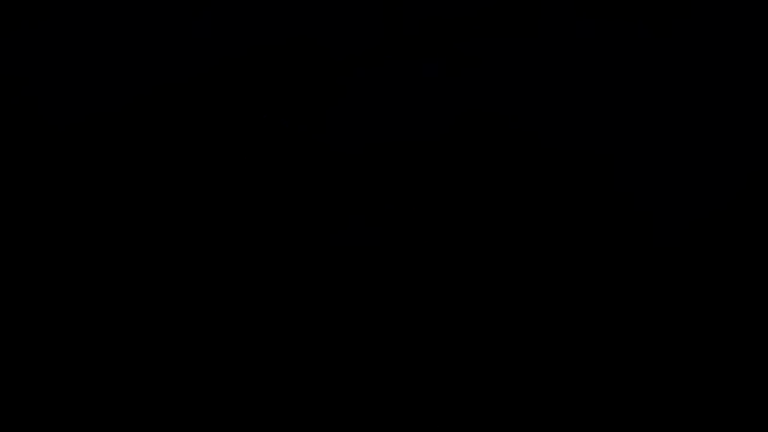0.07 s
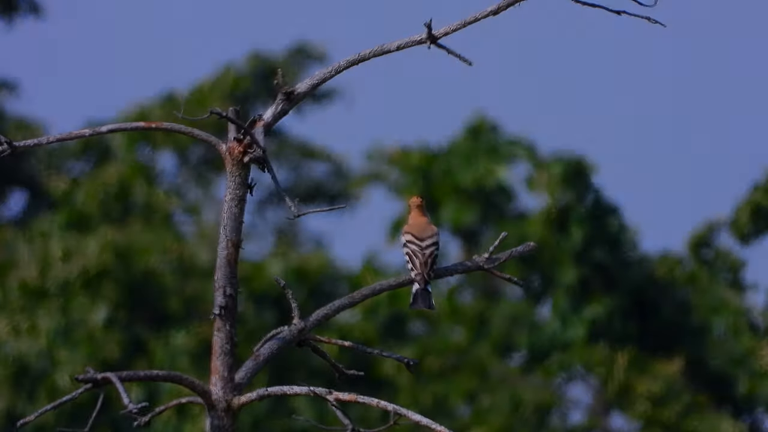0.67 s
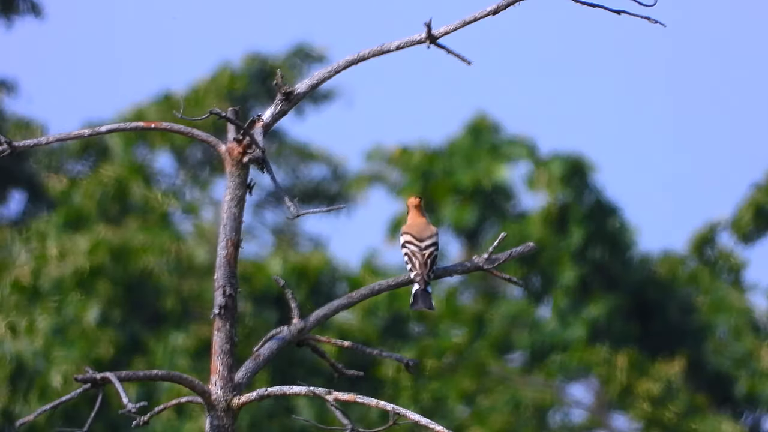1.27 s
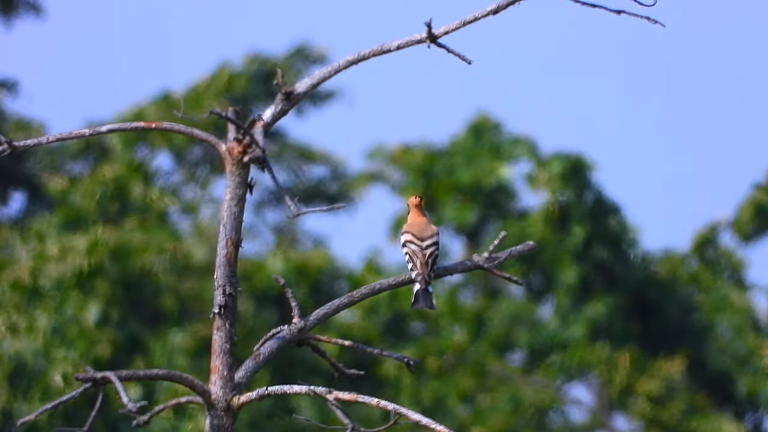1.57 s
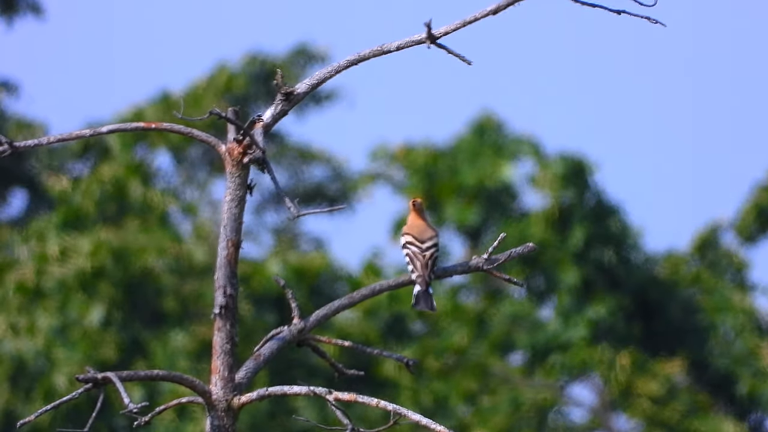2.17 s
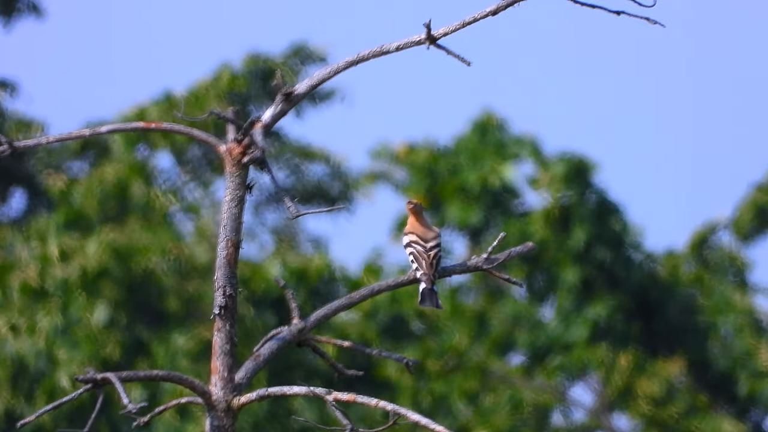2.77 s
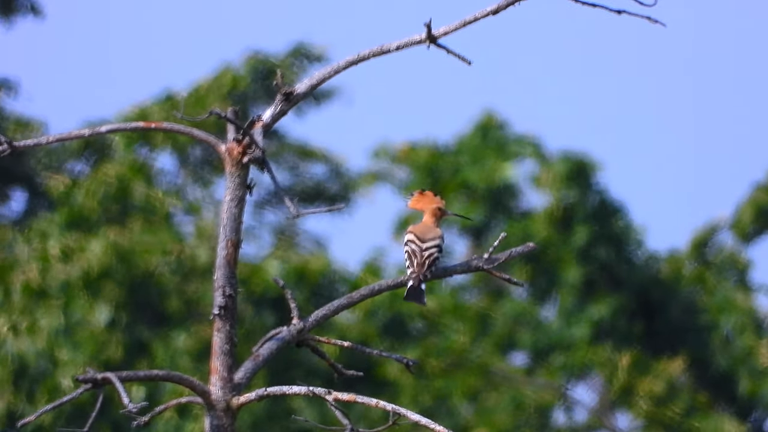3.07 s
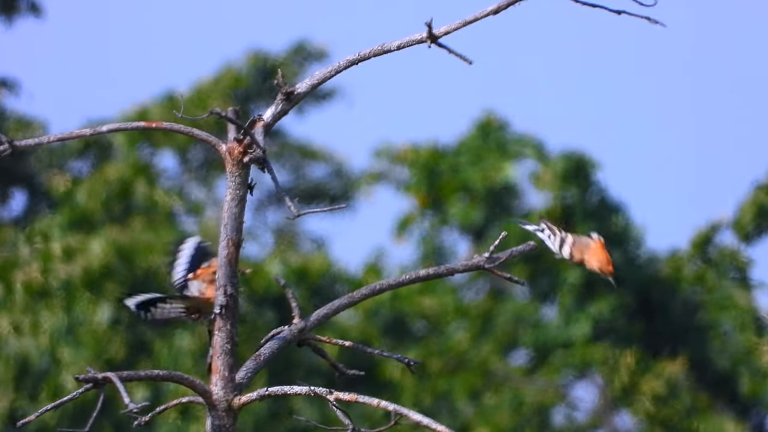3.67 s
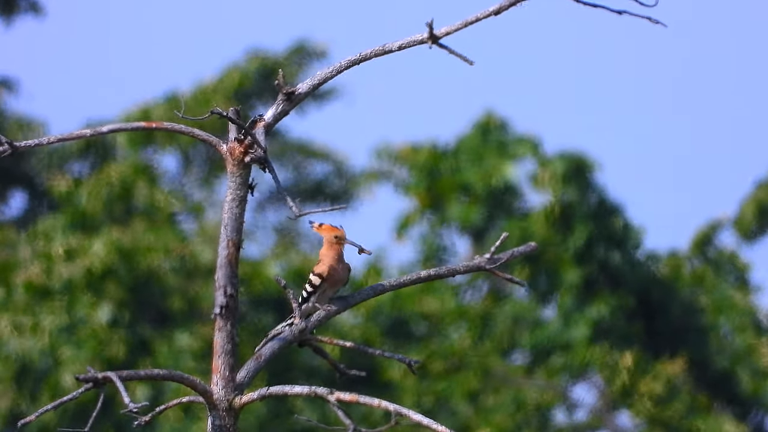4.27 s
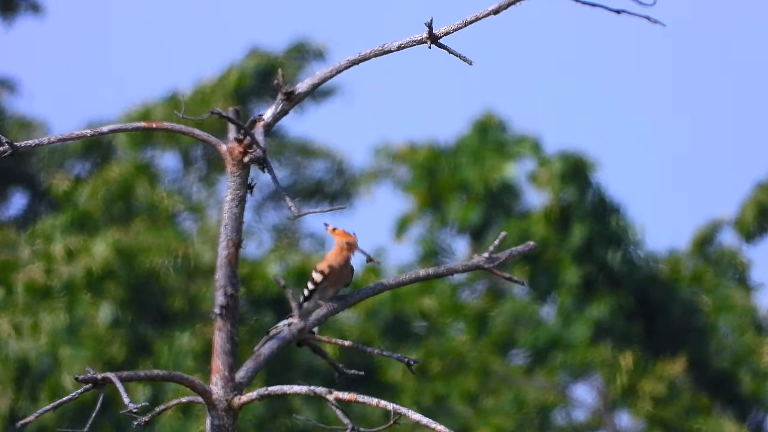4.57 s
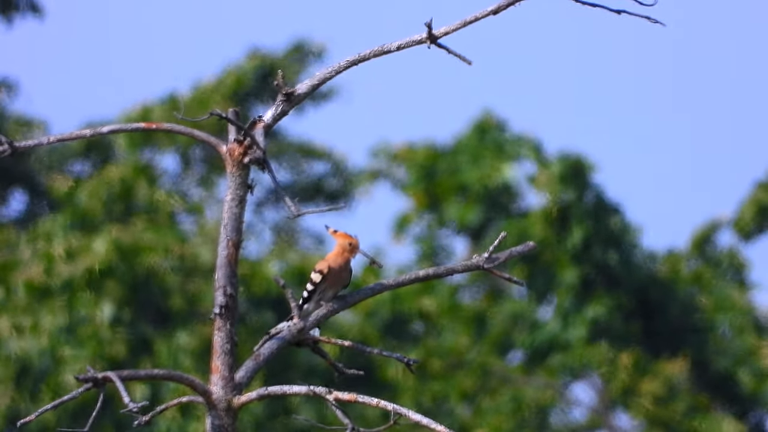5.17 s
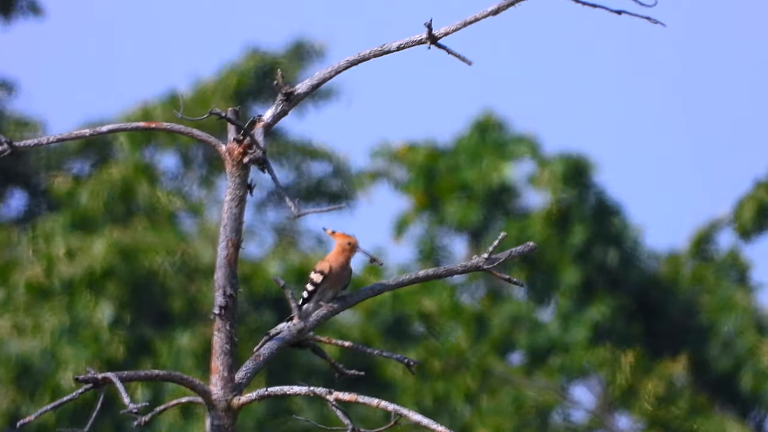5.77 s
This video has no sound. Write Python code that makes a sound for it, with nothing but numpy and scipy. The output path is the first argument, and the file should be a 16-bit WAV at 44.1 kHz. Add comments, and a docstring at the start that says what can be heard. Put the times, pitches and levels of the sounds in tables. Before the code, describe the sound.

Outdoors among trees, high twittering birdsong, near and far, rises out of silence over a light hiss of air. Twice, a couple of seconds apart, a hoopoe sounds a quick, low three-note hoot, round and clear, straight ahead of the microphone and well above everything else. Between its calls smaller birds squeak, warble and tumble down in pitch. Faint lower hoots trail the second call, then the small birds carry on with short phrases and soft rasps.

```python
"""Open air fades in from silence, a low rush and a hiss, with small songbirds whistling, trilling and
chipping throughout, each note a gliding sine, the near ones frayed by twigs. Just after 2 s a quavering
phrase comes twice, and a hoopoe gives three soft hoots, pure notes rounded by its inflated throat. Thin
squeaks, two falling cascades and a repeated warble follow. Near 4.6 s the hoopoe calls again, with fainter,
lower hoots behind it. A two-step phrase, sung twice, a run of low rasps and a few quick notes close."""
import sys
import numpy as np
from scipy import signal
from scipy.fft import rfft, irfft, next_fast_len
from scipy.io import wavfile
from scipy.ndimage import uniform_filter1d, map_coordinates

SR = 44100
rng = np.random.default_rng(int(sys.argv[2]) if len(sys.argv) > 2 else 0)


def persist_wave(psi):
    """Save psi, clipped to +-1, as 16-bit WAV."""
    counts = np.round(np.clip(psi, -1, 1) * 32767).astype(np.int16)
    wavfile.write(sys.argv[1], SR, np.atleast_2d(counts).T)


N = 261954

# The colour of the low air, the hiss and the blur of distant song.
# Each row: frequency in Hz, relative level in dB.
AIR_SPECTRUM = [(20, -8.5), (40, -6), (68, 1.5), (130, -3.5), (250, -6.5), (500, -9), (800, -12.5),
                (1200, -16), (2000, -19.5), (4000, -32)]
HISS_SPECTRUM = [(700, -15), (1700, 0), (4000, -2), (6800, -4.5), (8500, -5.5), (11000, -7.5), (15500, -10)]
CHORUS_SPECTRUM = [(1500, -22), (2400, -3.5), (3100, -8.5), (4300, 4), (5200, -10), (6200, -16.5),
                   (7500, -31.5)]
# The width of those beds. Each row: frequency in Hz, left-right correlation (1 is mono).
STEREO_LIKENESS = [(60, 1), (300, 0.96), (800, 0.93), (1500, 0.73), (4000, 1), (8000, 0.47), (14000, 0.61)]
# The echo of the foliage. Each row: frequency in Hz, seconds to die away by 60 dB.
FOLIAGE_DECAY = [(500, 0.15), (3000, 0.42), (7000, 0.11)]
# Slurred whistles. Each row: start and length in seconds, first, middle and last pitch in Hz, level in dB.
WHISTLE_NOTES = [(0.261, 0.16, 4370, 4900, 4060, -51), (0.977, .011, 3580, 3180, 2660, -48.5),
                 (1.034, 0.06, 4740, 4780, 4880, -51), (1.433, 0.036, 3400, 4000, 5100, -53),
                 (1.468, .055, 4500, 4070, 3980, -54.5), (1.738, 0.044, 5780, 4770, 4100, -55),
                 (2.705, .065, 4860, 4940, 4680, -52), (2.88, 0.054, 3770, 4740, 5410, -52),
                 (4.239, 0.043, 4800, 4900, 5110, -45), (4.508, .005, 5230, 4530, 4660, -45),
                 (4.535, 0.02, 4250, 4330, 4160, -47), (4.575, 0.11, 4840, 5160, 4680, -47),
                 (4.646, .089, 5060, 4320, 3820, -52.5), (5.792, 0.039, 3920, 4440, 5350, -46),
                 (5.838, 0.036, 6560, 5480, 4900, -52.5), (5.855, .03, 3090, 3700, 4270, -51)]
# Buzzy trills. Each row: start and length in seconds, first and settled pitch in Hz, level in dB,
# swings per second, swing depth in Hz.
TRILL_NOTES = [(0.372, 0.31, 4180, 4110, -56.5, 77, 282), (0.489, 0.17, 3120, 2700, -57, 72, 400),
               (0.731, 0.19, 4870, 4010, -47, 49, 395), (.972, 0.17, 3175, 2430, -54, 68, 302),
               (1.21, 0.095, 3740, 3500, -53.5, 150, 560), (1.304, .075, 3270, 2856, -50.5, 95, 130),
               (1.546, 0.12, 3400, 1970, -65.5, 70, 220), (1.695, 0.095, 5240, 5670, -57.5, 60, 490),
               (1.895, 0.058, 5170, 5190, -50.5, 270, 193), (1.954, 0.12, 3650, 2940, -60.5, 150, 304),
               (2.151, 0.063, 5340, 5080, -50.5, 115, 450), (2.223, 0.11, 3940, 3870, -50, 128, 404),
               (2.806, .05, 6300, 4780, -52.5, 110, 400), (3.058, 0.11, 2120, 2940, -56, 128, 380),
               (4.272, .18, 4840, 4640, -52, 142, 600), (4.688, .047, 5080, 4860, -48, 58, 375),
               (4.779, 0.048, 2555, 2640, -57, 230, 70), (4.83, 0.069, 2834, 2780, -50.5, 220, 70),
               (4.948, 0.096, 4060, 3220, -50.5, 59, 340), (5.076, 0.037, 4005, 4140, -49.5, 164, 90),
               (5.295, .1, 4840, 4200, -49.5, 115, 565), (5.879, .078, 4550, 5000, -47, 107, 396)]
# Distant whistles. Each row: start and length in seconds, first and last pitch in Hz, level in dB.
FAR_WHISTLE_NOTES = [(0.458, 0.55, 2750, 3060, -66.5), (1.56, .41, 4930, 4224, -61.5),
                     (2.997, 0.12, 4110, 3660, -63), (3.14, 0.15, 3050, 3020, -65.5),
                     (3.432, 0.16, 4580, 4840, -54.5), (3.845, 0.13, 4310, 4235, -58),
                     (5.036, .19, 2887, 2346, -62), (5.449, 0.18, 4480, 4250, -62)]
# Runs of chips. Each row: start in seconds, number of chips, spacing in seconds, first and settled pitch
# in Hz, sweep of each chip in Hz, first and last level in dB.
CHIP_SERIES = [(1.007, 8, 0.039, 5000, 5400, 700, -54.5, -64.5),
               (1.087, 3, 0.036, 4120, 4300, -400, -61, -54.5),
               (1.56, 3, 0.049, 4910, 4070, -300, -57, -63), (1.804, 2, .04, 5400, 4950, 600, -57, -53),
               (2.012, 3, 0.037, 4740, 4490, -200, -45.5, -47.5),
               (2.004, 3, 0.031, 4450, 4150, -800, -51, -50.5),
               (2.545, 4, 0.017, 3160, 3150, -3, -55, -50.5), (2.8, 3, 0.026, 3280, 3515, -250, -49.5, -45),
               (2.924, 3, 0.019, 4570, 5150, 1800, -47.5, -41),
               (3.703, 2, .028, 4440, 4400, 400, -52.5, -53),
               (4.428, 7, 0.029, 3100, 3440, -1100, -56.5, -55.5),
               (4.8, 3, .093, 5200, 5220, 652, -58.5, -61), (5.147, 4, .03, 4670, 3590, -350, -48.5, -55.5)]
# Three phrases. Each row: delay and length in seconds, first, middle and last pitch in Hz,
# level within the phrase in dB, vibrato depth in Hz.
QUAVER_NOTES = [(0, .07, 5050, 5220, 4780, -3.5, 219), (.055, 0.16, 4620, 4873, 5220, 0, 138),
                (.193, .072, 5080, 4590, 3920, -2, -1)]  # a shaky entry, a quavering climb, a smooth fall
WARBLE_NOTES = [(0, .045, 3990, 4244, 3480, -3, 0), (.042, 0.046, 3713, 4665, 3850, 0.5, 0),
                (.133, .025, 4100, 4970, 4950, -4, 0), (.168, .031, 2650, 3830, 3120, -2.5, 0)]  # two linked arches, an upward flick, a low hook
TWO_STEP_NOTES = [(0, .032, 4720, 4880, 4880, 0, 90), (.041, .012, 5400, 4950, 4700, -2, 0),
                  (.04, .053, 4200, 4050, 3700, -3, 130)]  # a held note, a quick drop, a lower note that sags
# When each phrase is sung. Each row: start in seconds, level in dB.
QUAVER_CUES = [(2.151, -50), (2.457, -48.5)]
WARBLE_CUES = [(3.757, -44.5), (4.061, -40.5)]
TWO_STEP_CUES = [(5.354, -45.5), (5.545, -46)]
# The hoopoe's calls. Each row: start in seconds, level of the first note going into the throat in dB.
HOOPOE_CUES = [(2.199, -25.0), (4.593, -27.5)]
# Thin, high squeaks and low rasps. Each row: start in seconds, level in dB.
SQUEAK_CUES = [(2.416, -58), (2.655, -58.5), (5.732, -58.5)]
RASP_CUES = [(5.524, -57), (5.573, -55), (5.622, -57), (5.672, -59.5), (5.722, -58.5)]
# Falling cascades. Each row: start and length in seconds, first, middle and last pitch in Hz, level in dB,
# flicks per second at the start, flick height in Hz before its growth is applied.
CASCADE_NOTES = [(3.209, .212, 5850, 3870, 2680, -50.5, 48.7, 1150),
                 (3.487, .197, 5950, 3920, 2650, -44.5, 47, 1300)]
# Fainter, lower hoots behind the second call. Each row: start and length in seconds,
# level going into the throat in dB, swell (larger is a slower rise).
LOW_HOOT_NOTES = [(4.651, 0.127, -49.5, 0.27), (4.907, .095, -42.5, 1.2), (5.108, 0.064, -66, 0.71)]


def amp(db):
    """Decibels to gain."""
    return 10 ** (np.asarray(db) / 20)


def unit(x):
    """x at rms 1."""
    return x / np.sqrt(np.mean(x ** 2) + 1e-20)


def along(points, hz):
    """(Hz, value) points read on a log axis."""
    freqs, values = np.transpose(points)
    return np.interp(np.log(hz + 1), np.log(freqs + 1), values)


def wobble(rate, size):
    """A smooth random curve, rate knots a second."""
    knots = rng.standard_normal(256)
    return map_coordinates(knots, [np.arange(size) * rate / SR], mode="wrap")


def filtered(x, response):
    """x shaped by a frequency response."""
    size = next_fast_len(N + SR // 2)
    return irfft(rfft(x, size) * response(np.fft.rfftfreq(size, 1 / SR)), size)[..., :N]


def add(track, s, sound):
    """Mix a sound into the track at s seconds."""
    part = track[max(0, round(s * SR)):][:len(sound)]
    part += sound[:len(part)]


def clock(length):
    """Time t in seconds and progress u (0-1) through one note."""
    u = np.linspace(0, 1, max(int(length * SR), 16))
    return u * length, u


def glide(u, start, middle, end):
    """A smooth arc through three pitches."""
    return start * (1 - u) * (1 - 2 * u) + 4 * middle * u * (1 - u) + end * u * (2 * u - 1)


def settle(u, start, end, lag=0.33):
    """A pitch that moves quickly at first and then levels off."""
    return end + (start - end) * np.exp(-u / lag)


def tone(hz):
    """A sine of rms 1 that follows a pitch curve."""
    return np.sqrt(2) * np.sin(2 * np.pi * np.cumsum(hz) / SR)


def rush(spectrum, patchy_db):
    """A stereo noise bed of rms 1 that swells and thins in soft patches of time and frequency."""
    def mid_and_side(hz):
        width = np.arccos(np.clip(along(STEREO_LIKENESS, hz), -1, 1)) / 2
        return amp(along(spectrum, hz)) * [np.cos(width), np.sin(width)]

    noise = signal.stft(rng.standard_normal((2, N)), nperseg=512)[2]
    patches = uniform_filter1d(rng.standard_normal(noise.shape[1:]), size=6, axis=0)
    patches = uniform_filter1d(patches, size=14, axis=1)
    pair = signal.istft(noise * amp(patchy_db * unit(patches)), nperseg=512)[1][:, :N]
    mid, side = filtered(pair, mid_and_side)
    return unit(np.array([mid + side, mid - side]))


def syrinx(u, hz, stress=1, jitter=0.0093, flutter_db=1.94, edge=0.23, octave_db=-40):
    """One songbird syllable of rms 1: a slightly unsteady whistle with a trace of its octave."""
    pitch = hz * (1 + jitter * wobble(355.8, len(u)))
    flutter = amp(flutter_db * wobble(160, len(u)))
    airflow = np.abs(np.sin(np.pi * u)) ** edge * stress * flutter
    return unit(airflow) * (tone(pitch) + amp(octave_db) * tone(2 * pitch))


def far_birds(count=90, centre_hz=3950, spread=0.26, swing_hz=280, level_db=-67, emphasis_db=7):
    """Birds twitter at random, deep in the trees."""
    track = np.zeros(N)
    starts = np.linspace(0, N / SR, count, endpoint=False)
    for s, (late, span, pitch, slope, speed, loud) in zip(starts, rng.standard_normal((count, 6))):
        t, u = clock(.06 * np.exp(0.63 * span))
        arc = centre_hz * np.exp(spread * np.tanh(pitch) + 0.22 * np.tanh(slope) * (u - .5))
        swing = 2 * np.pi * 55 * np.exp(0.34 * speed) * t
        twitter = syrinx(u, arc + swing_hz * np.cos(swing), stress=amp(emphasis_db * np.sin(swing)))
        add(track, s + .03 * late, amp(level_db + 2.8 * loud) * twitter)
    return track


def foliage(x):
    """Leaves and trunks scatter a short diffuse echo to each side."""
    hz, t, noise = signal.stft(rng.standard_normal((2, SR // 2)), SR, nperseg=256)
    decay = amp(-60 * t / along(FOLIAGE_DECAY, hz)[:, None])
    tail = signal.istft(noise * decay, SR, nperseg=256)[1]
    return signal.fftconvolve(x[None], tail / np.linalg.norm(tail[0]), axes=1)[:, :N]


def whistles():
    """Plain notes, each slurred through three pitches."""
    track = np.zeros(N)
    for s, length, start_hz, middle_hz, end_hz, db in WHISTLE_NOTES:
        _, u = clock(length)
        add(track, s, amp(db) * syrinx(u, glide(u, start_hz, middle_hz, end_hz)))
    return track


def twigs(x, scatter_db=-5.0, count=16):
    """Nearby twigs and leaves add many weak, shifting copies that fray each syllable."""
    delays = .001 + rng.exponential(.007, count)
    sways = rng.standard_normal((count, 80))
    knots = np.linspace(0, N, sways.shape[1])
    copies = np.zeros(N)
    for s, sway in zip(delays, sways):
        delayed = np.pad(x, (round(s * SR), 0))[:N]
        copies += delayed * np.interp(np.arange(N), knots, sway)
    return x + amp(scatter_db) * copies / np.sqrt(count)


def trills(unsteady=0.42, emphasis_db=6.5, lean=0.26, uneven=0.18):
    """The pitch swings unevenly as it settles: a quick, quiet upstroke, a slower, louder downstroke."""
    track = np.zeros(N)
    for s, length, start_hz, settled_hz, db, rate, swing_hz in TRILL_NOTES:
        t, u = clock(length)
        beat = 2 * np.pi * rate * t + unsteady * wobble(60, len(t))
        swing = beat + lean * np.cos(beat)
        depth_hz = swing_hz * (1 + uneven * wobble(70, len(t)))
        hz = settle(u, start_hz, settled_hz) + depth_hz * np.cos(swing)
        add(track, s, amp(db) * syrinx(u, hz, stress=amp(emphasis_db * np.sin(swing))))
    return track


def far_whistles(waver=0.0086):
    """Distant birds draw out thin notes that waver as they drift in pitch."""
    track = np.zeros(N)
    for s, length, start_hz, end_hz, db in FAR_WHISTLE_NOTES:
        _, u = clock(length)
        hz = (start_hz + (end_hz - start_hz) * u) * (1 + waver * wobble(120, len(u)))
        add(track, s, amp(db) * syrinx(u, hz))
    return track


def chip_runs(arch_hz=90, duty=.6, longest_s=0.022):
    """One short swept note repeats at an even pace while its pitch settles and it grows or fades."""
    track = np.zeros(N)
    for s, count, spacing, first_hz, settled_hz, sweep_hz, first_db, last_db in CHIP_SERIES:
        _, u = clock(min(duty * spacing, longest_s))
        sweep = glide(u, -sweep_hz / 2, arch_hz, sweep_hz / 2)
        for k, progress in enumerate(np.linspace(0, 1, count)):
            hz = settle(progress, first_hz, settled_hz) + sweep
            db = first_db + progress * (last_db - first_db)
            add(track, s + k * spacing, amp(db) * syrinx(u, hz))
    return track


def phrase(notes, cues, vibrato_per_s=62):
    """A bird repeats its phrase note for note, louder or softer."""
    track = np.zeros(N)
    for s, db in cues:
        for delay, length, start_hz, middle_hz, end_hz, note_db, vibrato_hz in notes:
            t, u = clock(length)
            vibrato = vibrato_hz * np.cos(2 * np.pi * vibrato_per_s * t)
            hz = glide(u, start_hz, middle_hz, end_hz) + vibrato
            add(track, s + delay, amp(db + note_db) * syrinx(u, hz))
    return track


def hoopoe_calls(count=3, spacing_s=.181, flat_hz=10.5, carry=.16):
    """The notes of each call: every hoot is shorter and louder than the last, and ends higher."""
    notes = []
    for s, db in HOOPOE_CUES:
        for k in range(count):
            cold = carry ** k  # the first hoot starts flat and swells slowly; the next keeps a share
            length = .102 - .0062 * k
            start_hz, end_hz = 600 - flat_hz * cold, 608 + 6.5 * k
            swell = .5 + .75 * cold
            notes.append((s + k * spacing_s, length, start_hz, end_hz, db + 0.5 * k, swell))
    return notes


def hoopoe(notes, ring_hz=608, quality=4, airy_db=-36, airy_hz=780, husky_db=-41, husky_hz=440):
    """The inflated throat passes only the fundamental: a pure note that swells, lifts and stops."""
    voice, effort = np.zeros(N), np.zeros(N)
    for s, length, start_hz, end_hz, db, swell in notes:
        _, u = clock(length)
        pressure = u ** swell * (1 - u) ** .45
        loudness = amp(db + .2 * wobble(90, len(u))) * pressure / pressure.max()
        add(voice, s, loudness * tone(start_hz + (end_hz - start_hz) * u))
        add(effort, s, loudness)
    # the throat rings for a few cycles, which softens both ends of each note
    throat = lambda hz: 1j * hz * ring_hz / (quality * (ring_hz ** 2 - hz ** 2) + 1j * hz * ring_hz)
    # a faint airy haze lies just above and below the note
    band = lambda hz: unit(wobble(170, N)) * tone(np.full(N, hz))
    haze = amp(airy_db) * band(airy_hz) + amp(husky_db) * band(husky_hz)
    return filtered(voice, throat) + effort * haze


def rough_arches(cues, length_s, foot_hz, top_hz, swings_per_s, swing_hz):
    """A short rise and fall roughened by a fast pitch swing: a squeak up high, a rasp down low."""
    track = np.zeros(N)
    t, u = clock(length_s)
    for s, db in cues:
        swing = 2 * np.pi * (swings_per_s * t + rng.random())
        hz = glide(u, foot_hz, top_hz, foot_hz) + swing_hz * np.cos(swing)
        add(track, s, amp(db) * syrinx(u, hz))
    return track


def cascades(flick_db=-1.0, slowing=.075):
    """A long falling whistle, broken by upward flicks that come ever more slowly."""
    track = np.zeros(N)
    for s, length, start_hz, middle_hz, end_hz, db, rate, flick_hz in CASCADE_NOTES:
        t, u = clock(length)
        beat = np.pi * rate * t * (1 - slowing * u)
        flick = (1 - np.abs(np.sin(beat))) ** 1.5
        growth = np.minimum(0.47 + 2 * u, 1.1)  # the flicks stand taller as the whistle sinks
        hz = glide(u, start_hz, middle_hz, end_hz) + flick_hz * flick * growth
        add(track, s, amp(db) * syrinx(u, hz, stress=amp(flick_db * flick)))
    return track


def low_hoots(start_hz=552, end_hz=570):
    """The notes of the fainter, lower hooting behind the second call."""
    return [(s, length, start_hz, end_hz, db, swell) for s, length, db, swell in LOW_HOOT_NOTES]


def scene(air_db=-57, hiss_db=-62, chorus_db=-62, song_echo_db=-18, far_echo_db=-3.5, hoot_echo_db=-42):
    """The hoots sit dead centre; everything else reaches the left side a moment sooner."""
    phrases = phrase(QUAVER_NOTES, QUAVER_CUES) + phrase(WARBLE_NOTES, WARBLE_CUES)
    phrases += phrase(TWO_STEP_NOTES, TWO_STEP_CUES)
    chatter = whistles() + trills() + chip_runs()
    rasps = rough_arches(RASP_CUES, .034, foot_hz=2370, top_hz=3010, swings_per_s=140, swing_hz=300)
    squeaks = rough_arches(SQUEAK_CUES, .03, foot_hz=5700, top_hz=6270, swings_per_s=150, swing_hz=150)
    song = twigs(phrases + chatter + rasps + squeaks + cascades())
    far = far_birds() + far_whistles()
    hoots = hoopoe(low_hoots() + hoopoe_calls())
    echo = foliage(amp(song_echo_db) * song + amp(far_echo_db) * far + amp(hoot_echo_db) * hoots)
    air = amp(air_db) * rush(AIR_SPECTRUM, patchy_db=1.58)
    hiss = amp(hiss_db) * rush(HISS_SPECTRUM, patchy_db=2.0)
    chorus = amp(chorus_db) * rush(CHORUS_SPECTRUM, patchy_db=8.5)
    left_lead = lambda hz: np.exp(1j * np.pi * hz / SR * np.array([[1], [-1]]))  # one sample apart
    return hoots + filtered(song + far + echo + air + hiss + chorus, left_lead)


def record(dry, fade_start_s=0.1, fade_length_s=1.467, fade_curve=1.98, top_hz=15720):
    """A slow fade-in, with the very top of the treble cut away."""
    fade = np.clip((np.arange(N) / SR - fade_start_s) / fade_length_s, 0, 1) ** fade_curve
    return filtered(dry * fade, lambda hz: hz < top_hz)


dry = scene()
out = record(dry)
persist_wave(out)
```